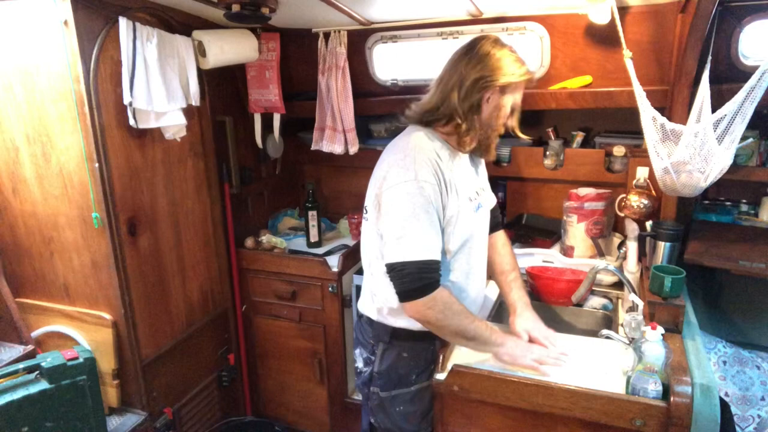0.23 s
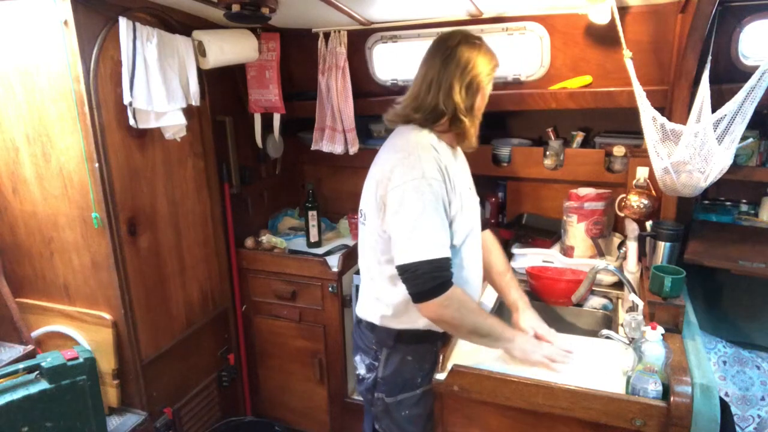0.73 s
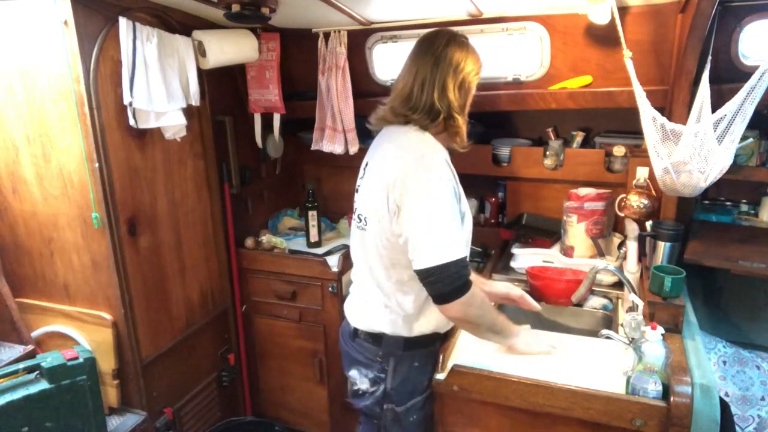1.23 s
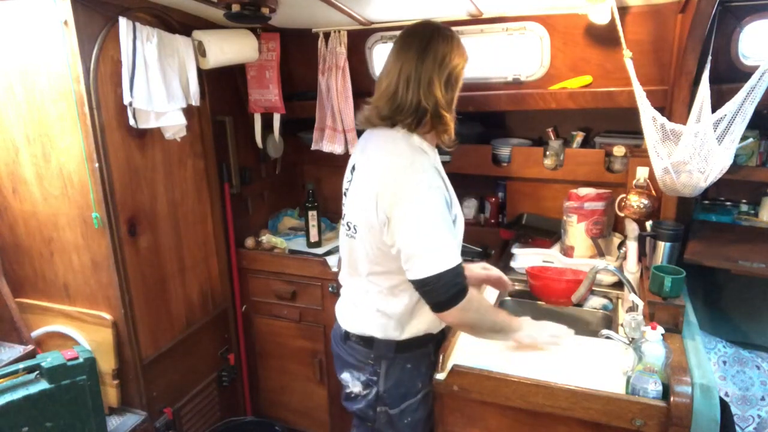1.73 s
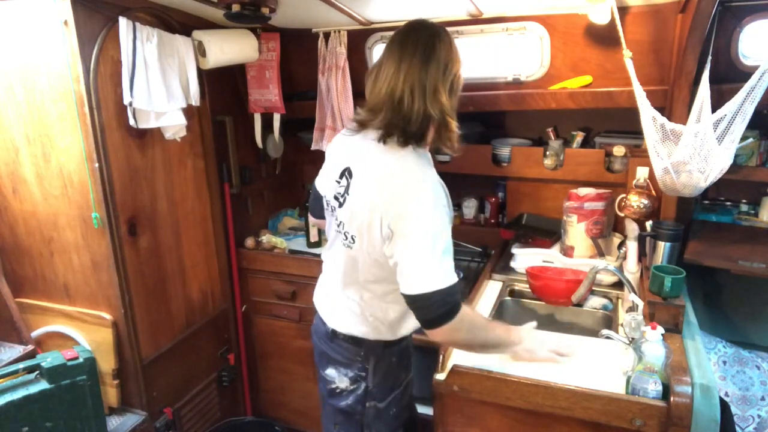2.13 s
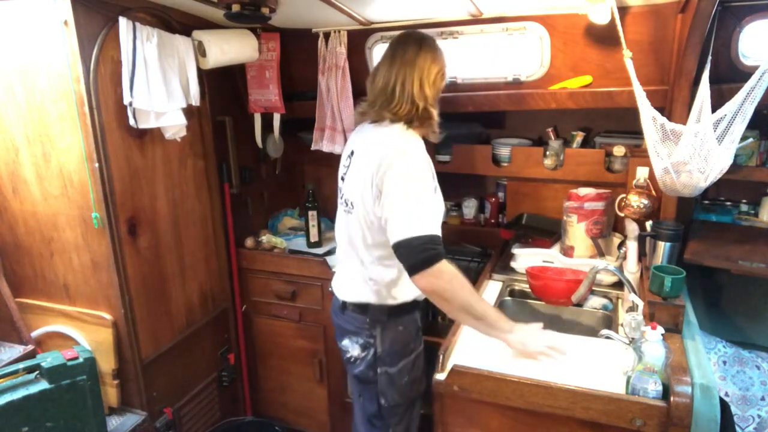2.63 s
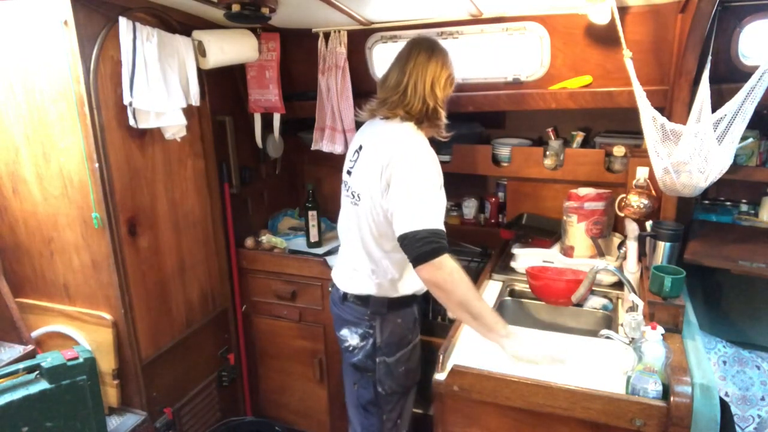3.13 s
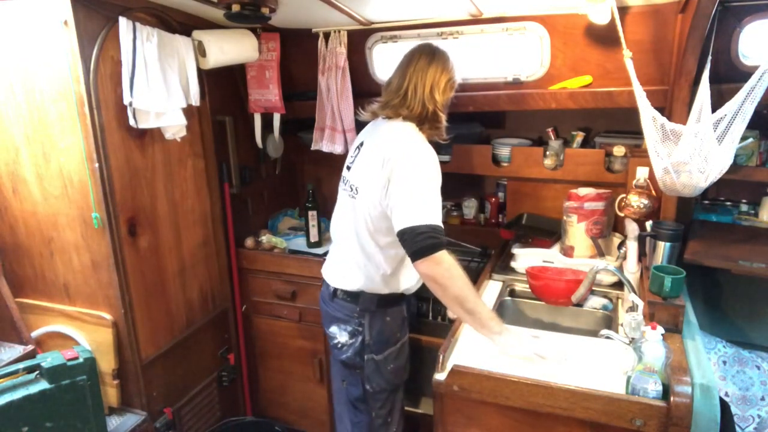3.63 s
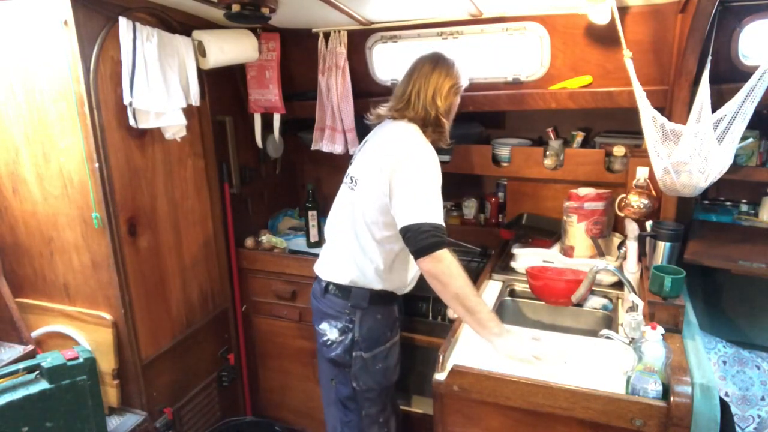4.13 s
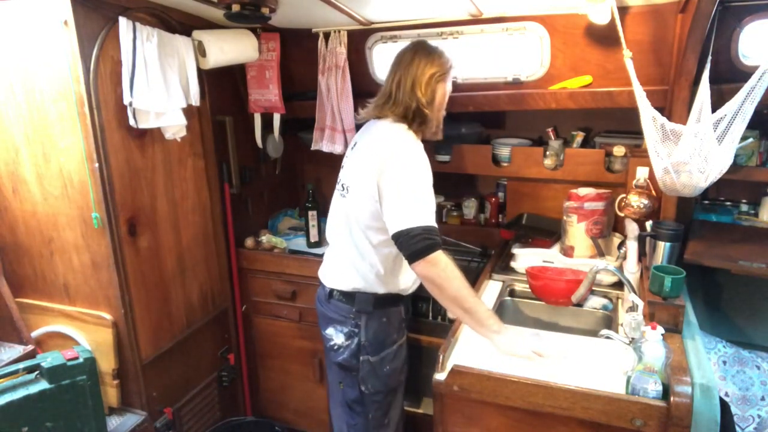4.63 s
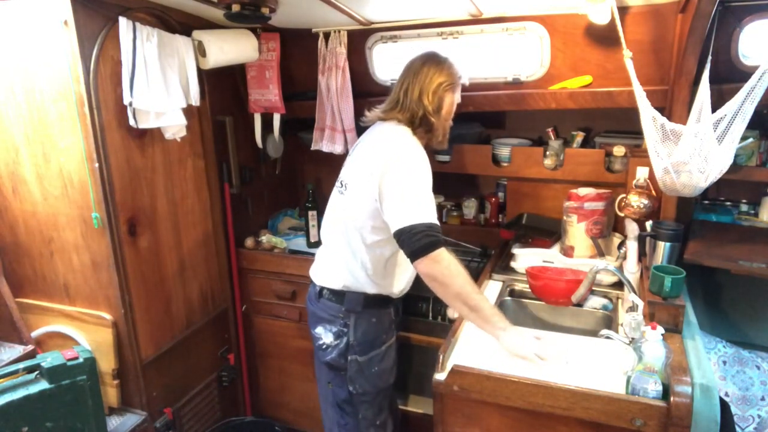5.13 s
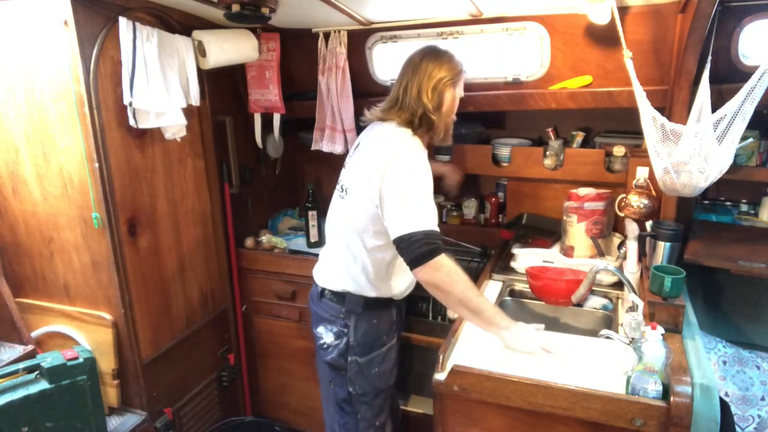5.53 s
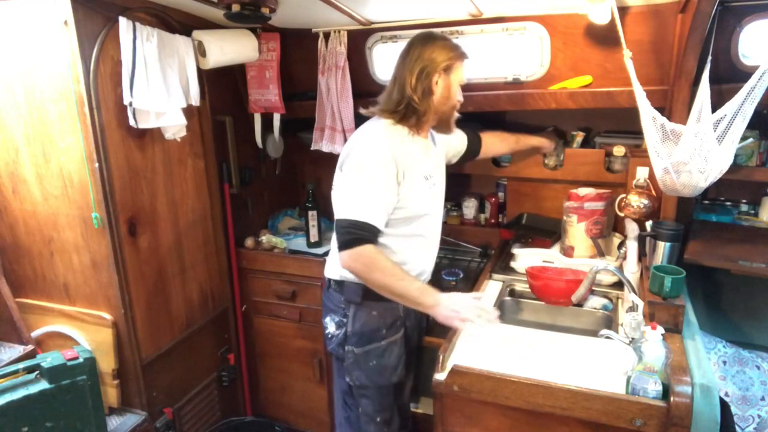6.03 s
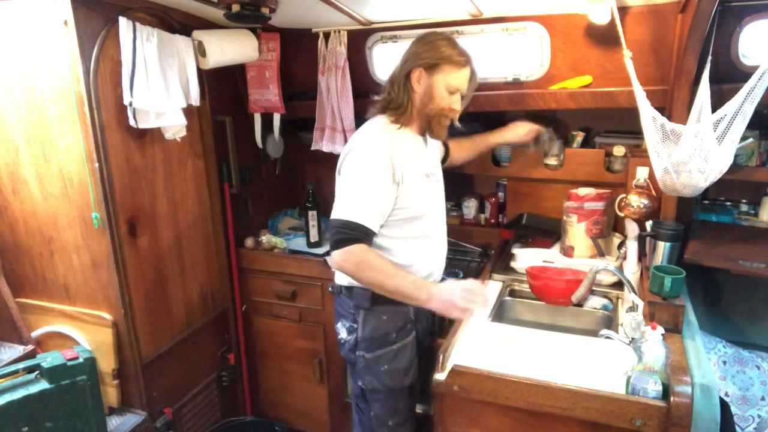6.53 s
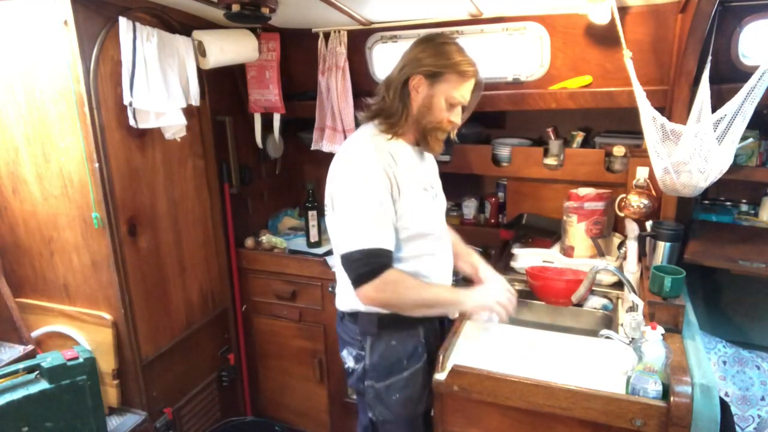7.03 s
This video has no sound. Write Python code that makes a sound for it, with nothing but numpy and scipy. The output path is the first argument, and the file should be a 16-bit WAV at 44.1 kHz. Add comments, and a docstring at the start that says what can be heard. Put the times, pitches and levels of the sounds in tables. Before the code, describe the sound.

In a small wooden cabin, dough is pushed against a hollow counter in dull, irregular thuds, with small taps from loose things. A deep, heavy thump lands early, with a brief metallic tinkle. Palms slide softly over the board and the woodwork knocks lightly as kneading continues. Near the end comes a hard wooden clack, the loudest crack, then quiet pats and rubs. It is heard from across the room over soft hiss.

```python
"""Small galley of a boat: bread dough is kneaded on a wooden worktop.
Hands and dough thump the top and the hollow cabinet booms. There are small clicks and taps; thin metal
tinkles at the heaviest blow, palms brush the board and woodwork knocks. Impacts are damped modes plus
noise dying away in the cabin. Behind it lie a soft hiss and a faint wandering whistle."""
import sys
import numpy as np
from scipy import signal
from scipy.io import wavfile
from scipy.ndimage import uniform_filter1d

SR = 44100
rng = np.random.default_rng(int(sys.argv[2]) if len(sys.argv) > 2 else 0)


def generate_wav(signal):
    """Clip the signal to [-1, 1] and save it as 16-bit WAV at the path in sys.argv[1]."""
    frames = np.transpose(np.atleast_2d(signal))
    scaled = np.clip(frames, -1, 1) * 32767
    pcm = np.round(scaled).astype(np.int16)
    wavfile.write(sys.argv[1], SR, pcm)


N = 321048
AGE_S = np.arange(int(0.7 * SR)) / SR   # time axis of one event


def from_db(db):
    """Decibels to gain."""
    return 10 ** (np.asarray(db) / 20)


def rms_one(x):
    """Scale to rms 1."""
    return x / np.sqrt(np.mean(x ** 2) + 1e-20)


def unit_blow(x):
    """Scale to the energy of 25 ms at rms 1."""
    return x / np.sqrt(np.sum(x ** 2) / (0.025 * SR) + 1e-20)


def at_hz(points, hz):
    """Interpolate a table on a log-frequency axis."""
    freqs, values = np.transpose(points)
    return np.interp(np.log(hz), np.log(freqs), values)


def add(out, start_s, sound):
    """Mix a sound in at start_s."""
    start = max(round(start_s * SR), 0)
    out[start:start + len(sound)] += sound[:N - start]


def band(x, low_hz, high_hz):
    """Causal band-pass."""
    sos = signal.butter(2, [low_hz, min(high_hz, 0.48 * SR)], "band", fs=SR, output="sos")
    return signal.sosfilt(sos, x)


def noise_bands(size):
    """Centres and rows of 0.4-octave noise bands, equal power per Hz."""
    edges_hz = 28 * 2 ** np.arange(0, 9.3, 0.4)
    white = rng.standard_normal((2, size + SR // 4))
    rows = [band(white[k % 2], low, high)[-size:]
            for k, (low, high) in enumerate(zip(edges_hz, edges_hz[1:]))]
    return np.sqrt(edges_hz[1:] * edges_hz[:-1]), np.array(rows)


def ring(modes, rise_s, pitch_hz, focus_db, direct, direct_s, scatter_db=0.03):
    """Struck modes, losing focus_db per octave from pitch_hz; a brief direct boost, then free decay."""
    hz, level_db, t60_s = np.transpose(modes)[:, :, None]
    strength, detune, phase = rng.standard_normal((3, len(modes), 1))
    gains = from_db(level_db + scatter_db * strength - focus_db * np.abs(np.log2(hz / pitch_hz)))
    sines = np.sin(2 * np.pi * hz * (1 + 0.0054 * detune) * AGE_S + 1.15 * phase)
    ringing = np.sum(gains * np.exp(-np.log(1000) * AGE_S / t60_s) * sines, axis=0)
    onset = 1 - np.exp(-AGE_S / rise_s)
    return unit_blow(ringing * onset * (1 + direct * np.exp(-AGE_S / direct_s)))


# cabin decay: freq_hz, t60_s
CABIN_DECAY = [(60, 1), (170, 0.62), (400, 0.41), (1000, 0.22), (4000, 0.2), (14000, 0.23)]


def burst(noise, spectrum, rise_s, direct, direct_s):
    """Dense ringing of one contact: direct sound, then cabin reflections dying band by band."""
    hz, rows = noise
    start = rng.integers(0, rows.shape[1] - len(AGE_S))
    tail = np.exp(-np.log(1000) * AGE_S / at_hz(CABIN_DECAY, hz)[:, None])
    onset = 1 - np.exp(-AGE_S / (rise_s + 1 / hz[:, None]))   # lows need a cycle to build
    bands = rows[:, start:start + len(AGE_S)] * onset * (tail + direct * np.exp(-AGE_S / direct_s))
    gains = from_db(at_hz(spectrum, hz)) * np.sqrt(hz / np.sum(bands ** 2, axis=1))
    return unit_blow(gains @ bands)


# background spectrum: freq_hz, density_db
HISS_SPECTRUM = [(15, -45), (25, -11), (38, 2.5), (222, 0.5), (307, 1.5), (449, -5), (542, 0.5), (857, -9),
                 (1090, -9), (1430, -14), (3580, -13), (6850, -18.5), (8050, -23), (8970, -24.5),
                 (15800, -28)]


def hiss(level_db=-65):
    """Soft, steady noise, strongest in the lows."""
    hz, rows = noise_bands(N)
    return from_db(level_db) * rms_one(from_db(at_hz(HISS_SPECTRUM, hz)) @ rows)


# small hard contact: freq_hz, density_db
CLICK_SPECTRUM = [(120, 8), (300, 2.5), (600, 6), (1300, 6), (2600, 2), (4200, 0), (5300, -6), (7200, -0.5),
                  (10000, -23), (16000, -13.5)]
# wood under the contact: freq_hz, level_db, t60_s
SUPPORT_MODES = [(252, -2.5, 0.2), (274, -4.5, 0.19), (376, -0.5, 0.12)]
# small sharp clicks and taps (loose things, fingertips, a knock's crack): start_s, level_db, pitch_hz
CLICKS = [(0.0506, -45, 3650), (0.8945, -52, 2280), (1.1112, -36.5, 3900), (1.6745, -51.5, 1550),
          (1.911, -36, 3510), (2.0237, -41, 1700), (2.2726, -36, 2234), (2.3294, -40.5, 3880),
          (2.36, -45, 3660), (2.4809, -51.5, 1600), (2.5093, -51, 1940), (2.5736, -51, 2120),
          (4.0574, -39.5, 1790), (5.0986, -67, 2080), (5.9138, -61, 4760), (6.002, -46.5, 3210),
          (6.7989, -51.5, 2050), (6.8673, -47, 3050)]


def clicks(noise, note_ratio=1.14, reach_ratio=3.3, firm_click_db=-38.5, firm_thud_db=-44.5):
    """Small contacts tick and snap, each with a note; harder ones are brighter. The wood below thuds."""
    out = np.zeros(N)
    tick = band(signal.unit_impulse(200), 3000, 21000)
    for start_s, level_db, pitch_hz in CLICKS:
        hardness = np.log2(pitch_hz / 3000)
        thud_db = firm_thud_db + 1.55 * (level_db - firm_click_db)
        snap = burst(noise, CLICK_SPECTRUM, rise_s=0.0008, direct=1.76, direct_s=0.0056)
        note = burst(noise, CLICK_SPECTRUM, rise_s=0.00028, direct=2.1, direct_s=0.0047)
        note = unit_blow(band(note, pitch_hz / note_ratio, pitch_hz * note_ratio))
        thud = ring(SUPPORT_MODES, rise_s=0.0034, pitch_hz=280, focus_db=-0.5, direct=0.6, direct_s=0.019)
        add(out, start_s, from_db(level_db + 2 + 3 * hardness) * tick)
        add(out, start_s, from_db(level_db - 7) * band(snap, 98.4, pitch_hz * reach_ratio))
        add(out, start_s, from_db(level_db - 7 + 2 * hardness) * note)
        add(out, start_s + 0.0012, from_db(thud_db) * thud)
    return out


# worktop and hollow cabinet: freq_hz, level_db, t60_s
WORKTOP_MODES = [(156.4, -7, 0.23), (168.1, -11, 0.55), (189.4, -0.5, 0.21), (198.3, -7.5, 0.43),
                 (252.7, -0.5, 0.2), (268.9, -1, 0.19), (289.3, -6.5, 0.38), (339.7, -9, 0.61),
                 (383.4, -5.5, 0.16), (425.4, -9, 0.27), (553, -9, 0.63)]
CABINET_MODES = [(51.6, -9.5, 0.33), (61, -7.5, 0.5), (71.5, -14.5, 0.32), (91.7, 3, 0.39),
                 (105.4, -7, .35)]
# dough thud and skin slap: freq_hz, density_db
THUD_SPECTRUM = [(60, 1), (130, -0.5), (220, -10.5), (350, -3.5), (480, -13), (800, -14.5), (1300, -38),
                 (3000, -53)]
SLAP_SPECTRUM = [(300, 0.5), (800, 7.5), (1400, 0.5), (2000, 0), (4000, -8), (6000, -14.5), (10000, -26.5),
                 (16000, -29)]
# hands and dough on the worktop: start_s, thud_db, slap_db, rise_s
THUMPS = [(0.405, -43.5, -51, 0.011), (0.898, -33.5, -49, 0.014), (0.97, -42.5, -55.5, 0.0062),
          (1.343, -44, -54, 0.027), (1.676, -45, -53, 0.0014), (1.795, -30.5, -37, 0.04),
          (2.22, -20.5, -30.5, .0025), (2.243, -25, -35.5, 0.0026), (2.693, -37.5, -42, 0.007),
          (2.724, -38, -45, 0.0047), (3.132, -39.5, -50, 0.028), (3.603, -43, -46, 0.0072),
          (3.912, -47, -57.5, 0.0017), (4.056, -28.5, -44, 0.022), (4.891, -35.5, -45.5, 0.02),
          (5.324, -38.5, -47.5, 0.044), (6.8, -43.5, -52.5, 0.013), (6.975, -43.5, -48, 0.004),
          (7.228, -46.5, -54.5, 0.012)]


def thumps(noise, push_s=0.018, push_hz=178, push_db=-37.5, push_boom_db=-43.5):
    """Fingers tap, skin slaps, the top thuds as the dough squashes, then weight reaches the cabinet."""
    out = np.zeros(N)
    for start_s, thud_db, slap_db, rise_s in THUMPS:
        # slower than the typical push: lower thud, more boom
        slowness = np.log2(rise_s / push_s)
        pitch_hz = push_hz * 2 ** (-0.21 * slowness)
        boom_db = push_boom_db + 0.63 * (thud_db - push_db) + 4 * slowness
        cushion_hz = np.interp(thud_db, [-29, -23], [15000, 1700])   # dough dulls heavy blows
        top = ring(WORKTOP_MODES, rise_s, pitch_hz, focus_db=8.5, direct=2.6, direct_s=0.061)
        boom = ring(CABINET_MODES, 4.6 * rise_s, pitch_hz=75, focus_db=2, direct=0.9, direct_s=0.091)
        skin = burst(noise, SLAP_SPECTRUM, rise_s=0.0013, direct=0.71, direct_s=0.0036)
        fingers = burst(noise, CLICK_SPECTRUM, rise_s=0.00046, direct=1.0, direct_s=0.0079)
        thud = burst(noise, THUD_SPECTRUM, rise_s, direct=1.5, direct_s=0.039)
        add(out, start_s - 0.001986, from_db(slap_db - 13.5) * unit_blow(band(fingers, 1330, 2510)))
        add(out, start_s - 0.002, from_db(slap_db - 6) * band(skin, 200, cushion_hz))
        add(out, start_s, from_db(thud_db - 11) * thud)
        add(out, start_s + 0.00078, from_db(thud_db - 3) * top)
        add(out, start_s + 0.0037, from_db(boom_db) * boom)
    return out


def heave(start_s=2.222, level_db=-22, pitch_hz=58, peak_s=0.0091):
    """Under the heaviest blow the cabinet gives and swings back in a few deep cycles."""
    out = np.zeros(N)
    envelope = AGE_S / peak_s * np.exp(1 - AGE_S / peak_s)
    add(out, start_s, from_db(level_db) * envelope * np.sin(2 * np.pi * pitch_hz * AGE_S))
    return out


# thin metal: freq_hz, level_db
METAL_MODES = [(8559, -6), (9060, -4), (9265, -27), (10131, -10), (11273, -8), (11413, -6), (12080, -10),
               (13286, -12), (14005, -7), (15289, -15), (15686, 3)]
# jolts from the heaviest blow: start_s, level_db
JOLTS = [(2.237, -50.5), (2.268, -47)]


def tinkle(width_hz=55, chatter_s=0.025, rasp_db=-7):
    """Jolted thin metal chatters: tiny contacts ring its high modes."""
    contacts, ringing = np.zeros((2, N))
    for start_s, level_db in JOLTS:
        chatter = rng.standard_normal(len(AGE_S)) ** 3 * AGE_S * np.exp(-2 * AGE_S / chatter_s)
        add(contacts, start_s, from_db(level_db) * unit_blow(chatter))
    radius = np.exp(-np.pi * width_hz / SR)
    for freq_hz, level_db in METAL_MODES:
        feedback = [1, -2 * radius * np.cos(2 * np.pi * freq_hz / SR), radius ** 2]
        mode = signal.lfilter([1, 0, -1], feedback, contacts + 1e-18)
        ringing += from_db(level_db) * rms_one(mode)
    return rms_one(ringing) * np.std(contacts) + from_db(rasp_db) * band(contacts, 4000, 14000)


# palm and sleeve strokes: start_s, length_s, level_db, centre_hz
STROKES = [(2.571, 0.17, -54, 2700), (3.649, 0.1, -67.5, 4000), (4.067, 0.066, -58, 2780),
           (4.323, 0.074, -57, 4000), (5.201, 0.14, -67.5, 3800), (5.891, 0.28, -64, 5460),
           (6.852, 0.24, -66, 5500), (7.166, 0.12, -63.5, 4500)]


def brushes(grain_db=3, clump_db=2, spread_ratio=1.77, air_gain=0.086):
    """Skin and cloth slide: clumped friction grains swell and fade with each stroke."""
    out = np.zeros(N)
    for start_s, length_s, level_db, centre_hz in STROKES:
        white, sizes, catches = rng.standard_normal((3, len(AGE_S)))
        clumps = rms_one(uniform_filter1d(catches, size=300))
        grains = white * from_db(grain_db * sizes + clump_db * clumps)
        body = band(grains, centre_hz / spread_ratio, centre_hz * spread_ratio)
        rub = rms_one(body + air_gain * band(grains, 600, 13400))
        envelope = signal.windows.tukey(int(length_s * SR), 0.6)
        add(out, start_s, from_db(level_db) * rub[:len(envelope)] * envelope)
    return out


# hollow woodwork, its hard edge, the panel behind: freq_hz, level_db, t60_s
WOOD_MODES = [(495, -13, 0.058), (552.7, -4, 0.14), (606.4, 1, 0.16), (600, -1, 0.09), (641.4, -5.5, 0.2),
              (673, -1, 0.17), (785, -2, 0.13), (818, -11, 0.11)]
EDGE_MODES = [(888, 3, 0.18), (928, 2, 0.17), (1032, 0, 0.1), (1174, -9, 0.17), (1180, 1, 0.077),
              (1299, -8, 0.17), (1427, -11.5, 0.16), (1850, -12.5, 0.2)]
PANEL_MODES = [(144.3, -1.5, 0.39), (171.6, 1, 0.32), (200, -1, 0.25), (236.5, -1.5, 0.21),
               (272.3, 1, 0.16), (389.7, -2, 0.19)]
# contact crack and dense wood ringing: freq_hz, density_db
CRACK_SPECTRUM = [(200, -33.5), (900, -18), (2000, -3), (2700, -1.5), (4000, 3), (4900, -16), (7000, -9.5),
                  (10000, -32), (16000, -34.5)]
WOOD_SPECTRUM = [(40, -49), (75, -20), (110, -23), (170, -8), (400, -3), (620, -7.5), (850, -8),
                 (1200, -11.5), (2000, -21), (4000, -40)]
# knocks on woodwork: start_s, level_db, hardness (0-1)
KNOCKS = [(4.246, -43, 0.03), (4.307, -38.5, .05), (4.343, -41.5, 0.4), (4.388, -42, 0.1),
          (4.491, -46.5, 0), (4.792, -34, 0.32), (5.034, -36, 0.57), (6, -50, 0.67), (6.024, -46.5, 0.22),
          (6.099, -17.5, 0.96), (6.286, -41.5, 0.89)]


def knocks(noise):
    """Struck wood gives a hollow note; hard contacts crack and clack, soft ones thud the panel."""
    out = np.zeros(N)
    for start_s, level_db, hardness in KNOCKS:
        crack_db = level_db + np.interp(hardness, [0, 1], [-26, -13.5])
        clack_db = level_db + np.interp(hardness, [0, 1], [-20.5, -4])
        panel_db = level_db + np.interp(hardness, [0, 1], [3.5, -10])
        note = ring(WOOD_MODES, rise_s=0.0019, pitch_hz=603, focus_db=-1, direct=1.1, direct_s=0.0077)
        clack = ring(EDGE_MODES, rise_s=0.0009, pitch_hz=950, focus_db=5, direct=1.8, direct_s=0.0059)
        panel = ring(PANEL_MODES, rise_s=0.0029, pitch_hz=194, focus_db=12.5, direct=0.6, direct_s=0.014)
        crack = burst(noise, CRACK_SPECTRUM, rise_s=0.00039, direct=2.1, direct_s=0.0041)
        body = burst(noise, WOOD_SPECTRUM, rise_s=0.000393, direct=1.3, direct_s=0.021)
        add(out, start_s - 0.001, from_db(crack_db) * crack)
        add(out, start_s, from_db(level_db - 3) * note + from_db(clack_db) * clack)
        add(out, start_s + 0.001088, from_db(level_db - 9) * body)
        add(out, start_s + 0.0015, from_db(panel_db) * band(panel, 160, 990))
    return out


# whistle swoops: start_s, length_s, level_db, from_hz, to_hz
SWOOPS = [(4.586, .09, -76, 6600, 8400), (4.747, 0.21, -85, 8500, 8100), (5.35, 0.23, -78, 8300, 8200),
          (5.768, 0.21, -76.5, 7900, 7600), (6.39, .2, -76, 7300, 8400), (6.652, 0.31, -75, 8380, 6960),
          (7.085, 0.11, -73.5, 8670, 7700)]


def whistle(flutter_hz=230, ragged_db=2.5, sag_hz=201):
    """A faint, airy, very high tone glides up and down; each swoop swells, flutters and fades."""
    out = np.zeros(N)
    lowpass = signal.butter(2, flutter_hz, fs=SR, output="sos")
    for start_s, length_s, level_db, from_hz, to_hz in SWOOPS:
        size = int(length_s * SR)
        along = np.linspace(0, 1, size)
        pitch_hz = from_hz + (to_hz - from_hz) * along - sag_hz * np.sin(np.pi * along)
        fast, slow = rng.standard_normal((2, len(AGE_S)))
        waver = from_db(ragged_db * rms_one(uniform_filter1d(slow, size=900)))
        flutter = rms_one(signal.sosfilt(lowpass, fast) * waver)
        tone = np.sqrt(2) * np.sin(2 * np.pi * np.cumsum(pitch_hz) / SR)
        add(out, start_s, from_db(level_db) * tone * flutter[:size] * signal.windows.tukey(size, 0.3))
    return out


def scene():
    """All sources at one microphone across the cabin."""
    noise = noise_bands(2 * SR)
    mix = hiss() + clicks(noise) + thumps(noise) + heave() + tinkle() + brushes()
    return (mix + knocks(noise) + whistle())[None]


def record(dry, low_hz=41, high_hz=15900):
    """The microphone drops the deepest bass; the top is cut steeply."""
    thinned = signal.sosfilt(signal.butter(4, low_hz, "highpass", fs=SR, output="sos"), dry)
    return signal.sosfilt(signal.ellip(12, 0.1, 80, high_hz, fs=SR, output="sos"), thinned)


dry = scene()
out = record(dry)
generate_wav(out)
```